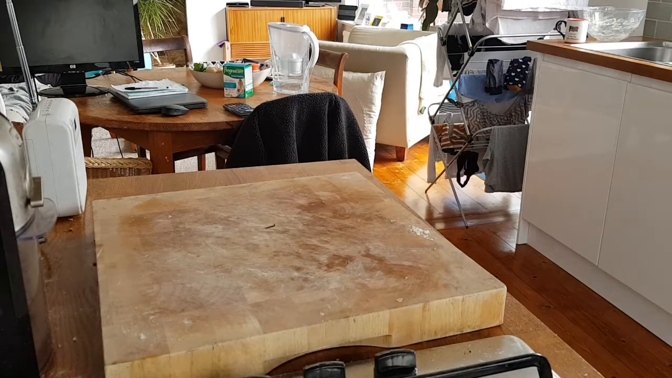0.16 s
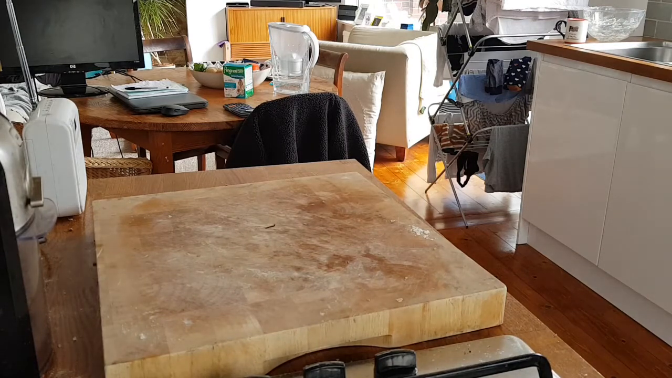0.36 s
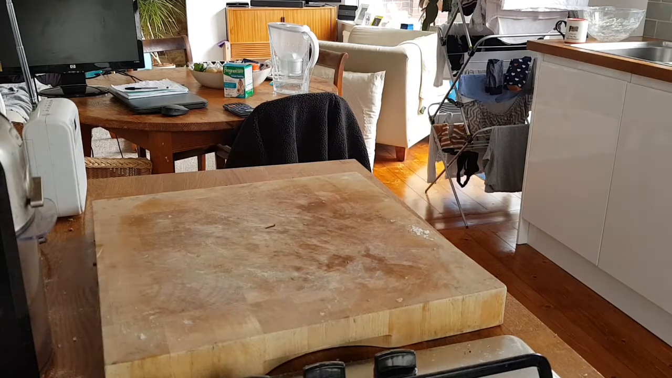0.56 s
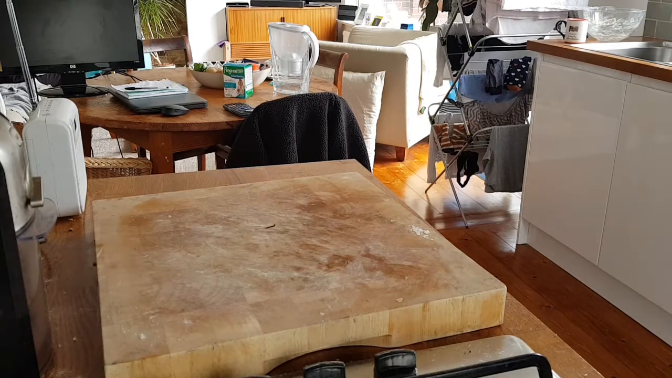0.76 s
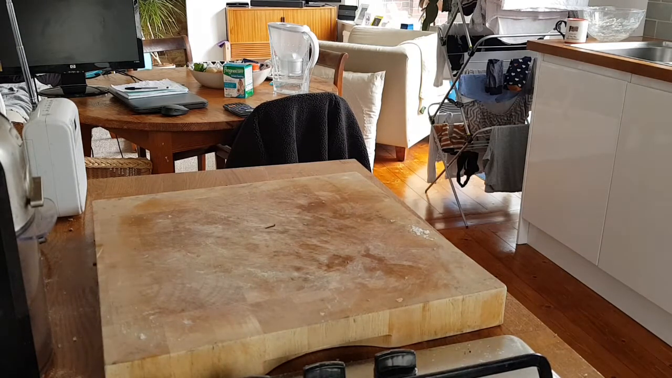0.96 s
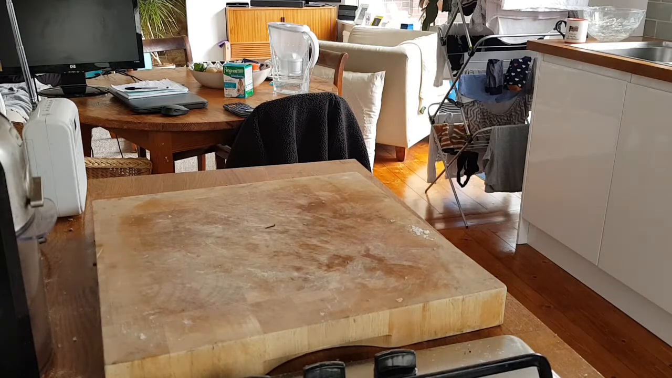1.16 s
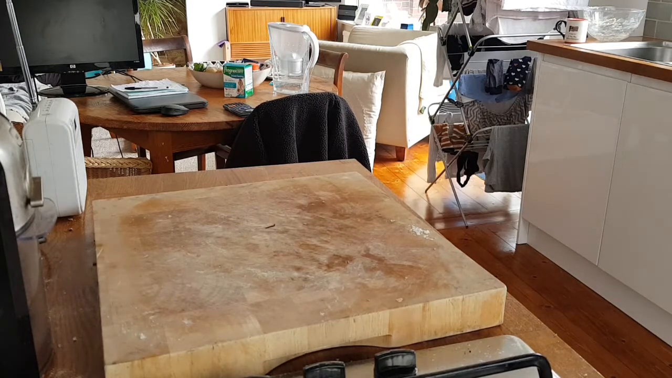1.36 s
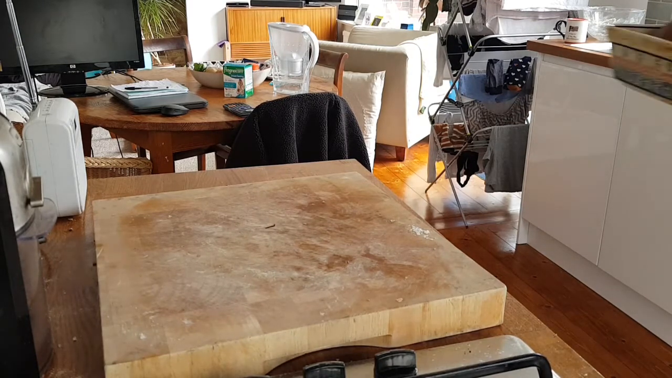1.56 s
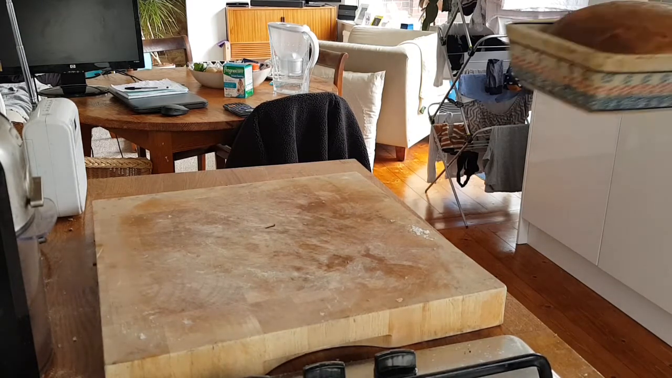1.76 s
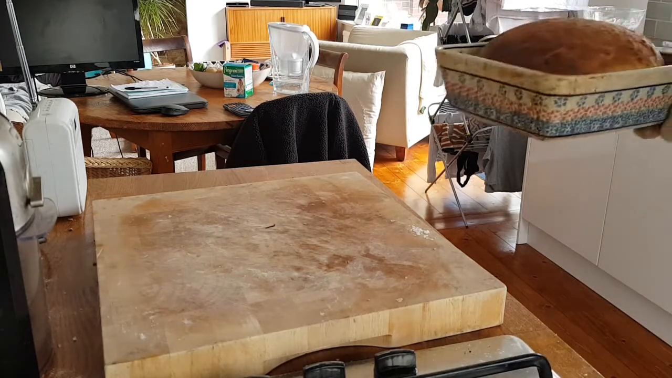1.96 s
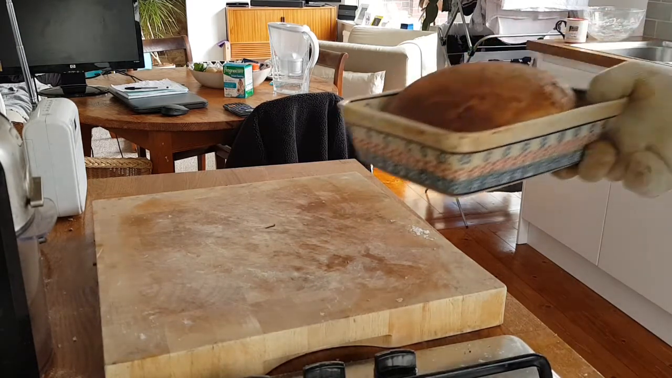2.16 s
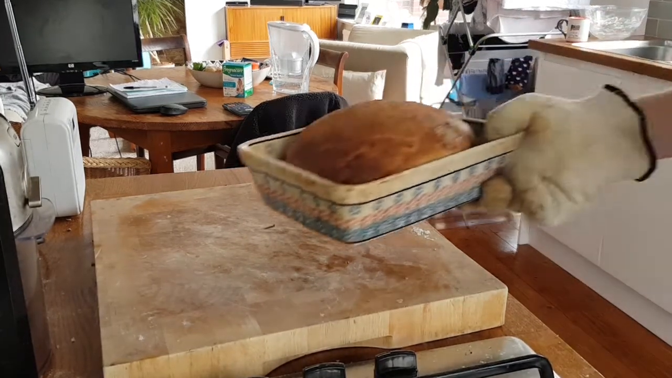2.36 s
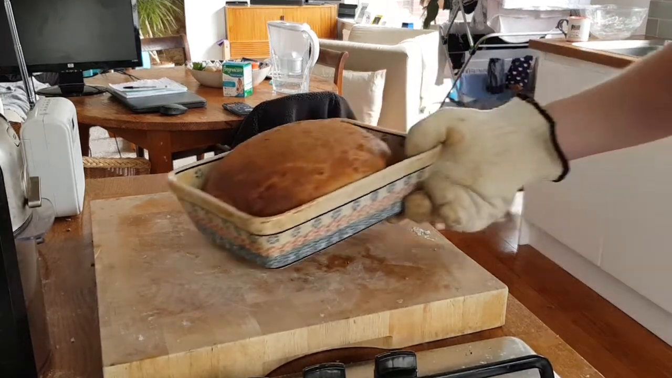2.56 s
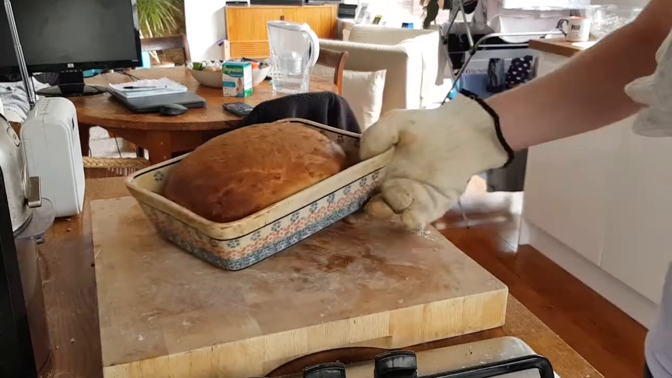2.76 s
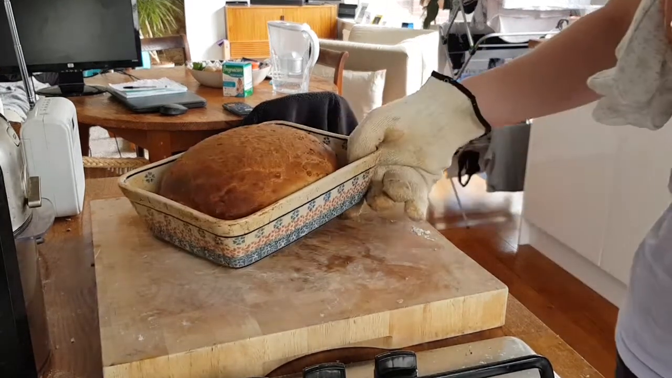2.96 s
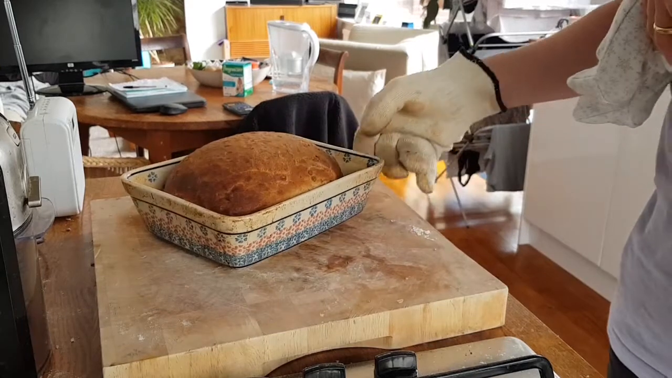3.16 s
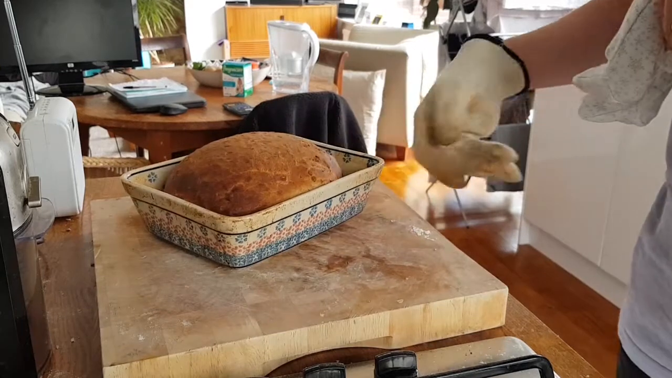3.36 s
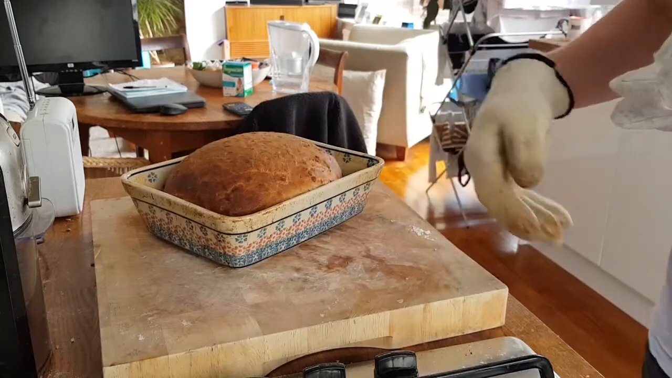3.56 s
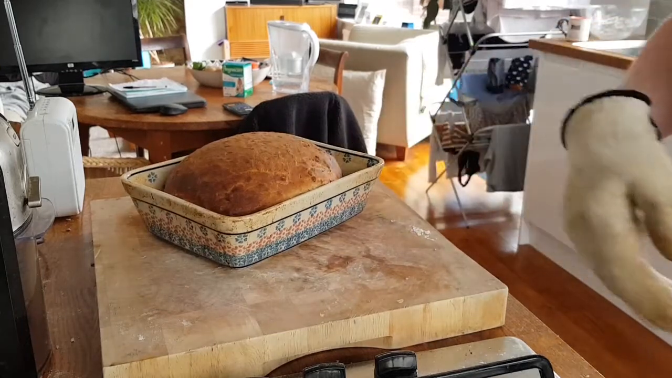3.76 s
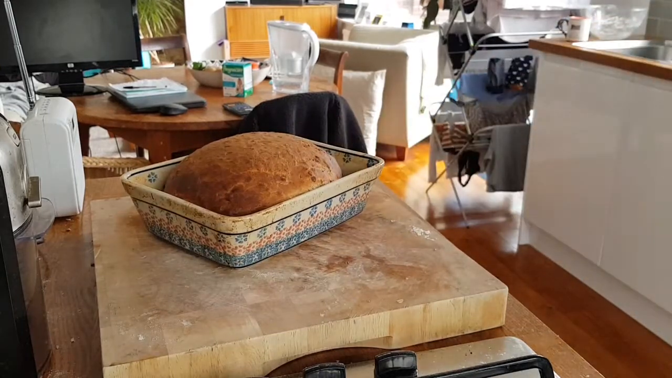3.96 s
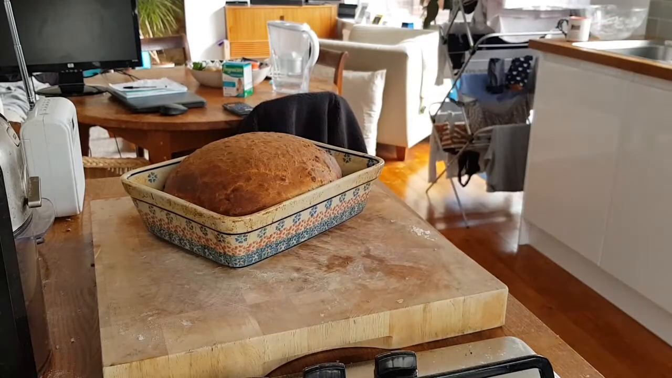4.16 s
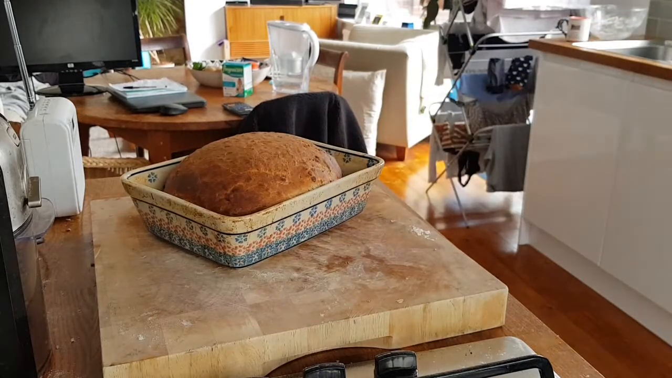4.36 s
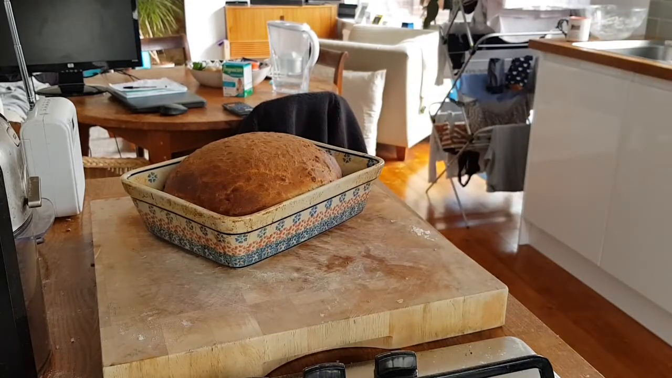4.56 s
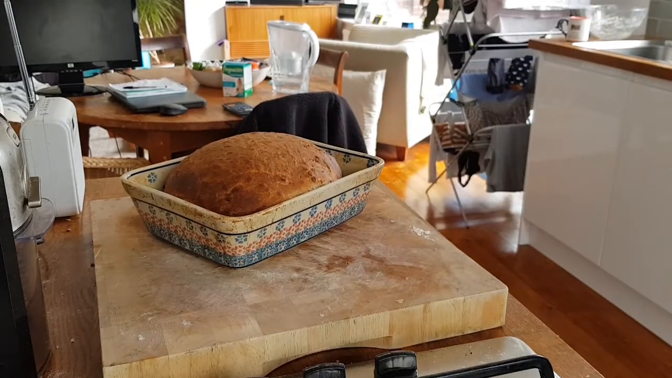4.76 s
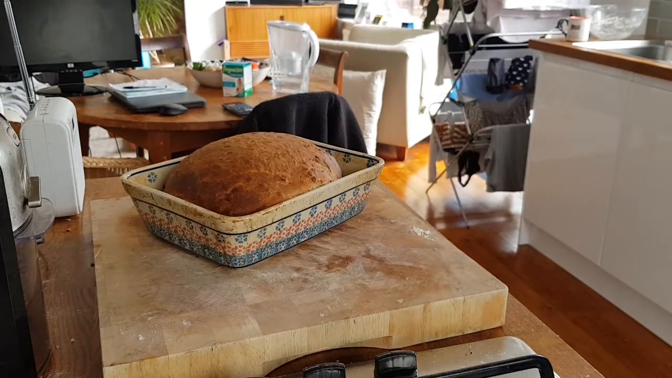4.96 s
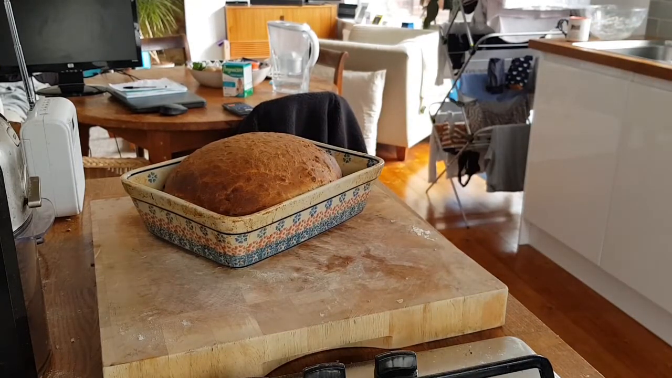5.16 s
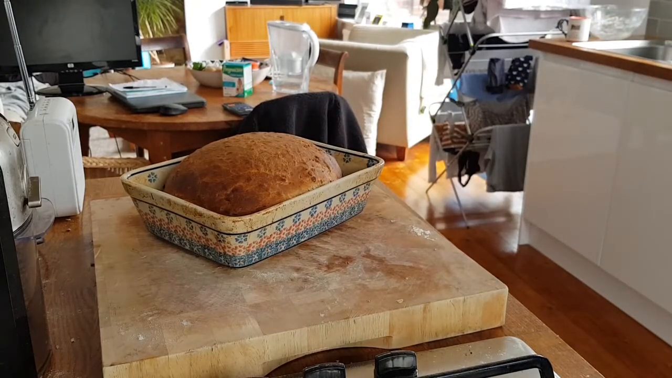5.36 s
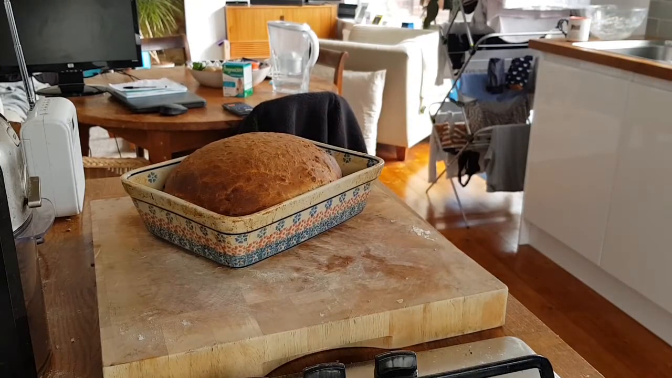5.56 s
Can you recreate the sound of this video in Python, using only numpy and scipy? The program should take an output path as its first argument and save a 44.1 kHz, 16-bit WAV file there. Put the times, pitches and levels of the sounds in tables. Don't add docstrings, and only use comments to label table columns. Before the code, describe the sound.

Soft footsteps cross a kitchen floor, stiff gloves crackle, then a heavy ceramic dish lands on thick wood with two knocks over a fridge hum.

```python
import sys
import numpy as np
from scipy import signal
from scipy.fft import rfft, irfft
from scipy.io import wavfile
from scipy.ndimage import uniform_filter1d

SR = 44100
rng = np.random.default_rng(int(sys.argv[2]) if len(sys.argv) > 2 else 0)


def inscribe(sig):
    pcm = np.round(np.clip(np.atleast_2d(sig).T, -1, 1) * 32767)
    wavfile.write(sys.argv[1], SR, pcm.astype(np.int16))


def volts_from_db(level):
    exponent = np.asarray(level, float) / 20
    return 10 ** exponent


N = 247886
T = np.arange(N) / SR
PORT_LAG_S = 0.0004

# (frequency [Hz], level [dB], t60 [s])
FLOORBOARD = [(67.8, -47, 0.36), (138.1, 3.5, 0.18), (172.6, -15, 0.36), (253, -5, 0.094)]


def on_log(hz, table):
    f, v = np.transpose(table)
    return np.interp(np.log(hz + 1), np.log(f), v)


def colour(x, table):
    g = volts_from_db(on_log(np.fft.rfftfreq(x.shape[-1], 1 / SR), table))
    return irfft(rfft(x) * g / np.sqrt(np.mean(g ** 2)), x.shape[-1])


def pair(size):
    # (frequency [Hz], coherence [0..1])
    likeness = [(150, 1), (300, 0.92), (600, .8), (1000, 0.15), (1500, 0.063), (4000, 0.02)]
    hz = np.fft.rfftfreq(size, 1 / SR)
    c = np.clip(on_log(hz, likeness), 0, 1)
    mid, side = rfft(rng.standard_normal((2, size)))
    left = np.sqrt(1 + c) * mid + np.sqrt(1 - c) * side
    right = np.sqrt(1 + c) * mid - np.sqrt(1 - c) * side
    delay = np.exp(-2j * np.pi * hz * PORT_LAG_S)
    return irfft([left * delay, right], size) / np.sqrt(2)


def late(x):
    return np.array([np.interp(T - PORT_LAG_S, T, x), x])


def sides(pan_db):
    return volts_from_db(np.array([[pan_db], [-pan_db]]) / 2)


def narrow(hz, width):
    g = 1 / (1 + (2 * (np.fft.rfftfreq(N, 1 / SR) - hz) / width) ** 2)
    return irfft(rfft(pair(N)) * g / np.sqrt(np.mean(g ** 2)), N)


def ring(modes):
    t = T[:SR // 2]
    return sum(volts_from_db(db) * np.sin(2 * np.pi * hz * t) * 1000. ** (-t / t60) for hz, db, t60 in modes)


def swell(start, length, rise=0.36):
    t = np.maximum(T - start, 0) / length
    return (1 - np.exp(-t / rise)) * np.exp(-t) * 2


def strokes(table):
    total = 0
    for s, db, attack, hold, release in table:
        below = np.maximum((s - T) / attack, (T - s - hold) / release)
        total = total + volts_from_db(db - 20 * np.maximum(0, below).clip(0, 9))
    return total


def rough(rate, depth_db):
    k = int(SR / rate)
    levels = np.repeat(rng.standard_normal(N // k + 1), k)
    return volts_from_db(depth_db * uniform_filter1d(levels, k)[:N])


def room(x, wet_db, gap_s):
    # (frequency [Hz], t60 [s])
    room_t60 = [(60, 0.56), (250, .38), (1000, 0.37), (4000, 0.36), (9000, 0.33), (16000, .2)]
    # (frequency [Hz], level [dB], t60 [s])
    room_modes = [(68, -58.5, 0.13), (129.34, -53, 0.3)]
    t, noise, tail = T[:SR], rfft(pair(SR)), 0
    octave = np.log2(np.fft.rfftfreq(SR, 1 / SR) + 1)
    for hz in 31.25 * 2. ** np.arange(10):
        band = irfft(noise * np.clip(1 - abs(octave - np.log2(hz)), 0, 1), SR)
        tail = tail + band * 1000. ** (-t / on_log(hz, room_t60))
    tail = tail * (1 - np.exp(-(t / gap_s) ** 2)) * volts_from_db(wet_db) / np.sqrt(SR / 40)
    tail[:, :SR // 2] += ring(room_modes)
    wet = signal.fftconvolve(x[1:], tail)[:, :N]
    return signal.sosfilt(signal.butter(2, 50., "high", fs=SR, output="sos"), x + wet)


def kitchen():
    # (frequency [Hz], width [Hz], level [dB])
    hum_lines = [(99.6, 12, -61), (108, 35, -55.5), (52.83, 12, -73), (194, 17, -71.5), (480, 21, -79.5),
                 (652.5, 20, -81.5), (700, 6, -81.5), (1130, 89, -81.5)]
    # (frequency [Hz], density [dB per Hz])
    air_tint = [(20, -1.5), (60, -3), (150, -4), (260, -7.5), (430, -19.5), (640, -11.5), (780, -21.5),
                (1200, -23), (1400, -31), (2200, -39.5)]
    # (frequency [Hz], density [dB per Hz])
    hiss_tint = [(880, -38), (1500, -9), (1990, -3.5), (2920, -7), (3410, -8.5), (8620, -11), (11800, -5.5),
                 (15500, -6)]
    hum = sum(volts_from_db(db) * narrow(hz, width) for hz, width, db in hum_lines)
    hum = hum + volts_from_db(-58) * np.sqrt(2) * late(np.sin(2 * np.pi * 100 * T))
    air = volts_from_db(-61.5) * rough(16, 1.5) * colour(pair(N), air_tint)
    hiss = volts_from_db(-74.5) * colour(pair(N), hiss_tint)
    return (hum + air) * sides(1.7) + hiss


def squeaks():
    # (time [s], length [s], frequency [Hz], width [Hz], level [dB])
    rubs = [
        (0.132, 0.012, 7160, 500, -72.5),
        (0.149, 0.022, 9840, 500, -78),
        (2.446, .018, 13000, 400, -59),
        (2.488, .1, 2200, 300, -73.5),
        (2.779, .1, 2702, 500, -64.5),
        (3.08, .05, 2604, 800, -60.5),
        (4.678, 0.01, 2790, 400, -61),
        (4.691, .03, 3815, 500, -70),
    ]
    return sum(volts_from_db(db) * swell(s, length, rise=0.2) * narrow(hz, width) for s, length, hz, width, db in rubs)


def steps():
    # (time [s], slap peak [dB], thump [dB re slap], scuff [dB re slap], contact [s])
    footfalls = [(0.164, -52, 9, -50, 0.017), (0.547, -53, -6, -6.5, 0.024), (0.563, -43, -13, -11, 0.019),
                 (0.709, -36.5, -8, -19.5, 0.016), (0.857, -46.5, 0, -45, 0.0086),
                 (1.21, -40.5, -10, -12.5, 0.028), (1.304, -46, -13, -15, 0.022),
                 (1.415, -34.5, -20, -12.5, 0.042), (1.44, -34, -2, -4.5, 0.012),
                 (1.971, -40.5, -18, -11.5, 0.019), (2.149, -43, -5, -13.5, 0.017),
                 (2.165, -36, -5.5, -16.5, 0.013), (2.448, -40.5, 2.5, -11.5, 0.017),
                 (4.043, -54, -19, -15, 0.03592), (4.677, -53, 4, -8, 0.04),
                 (4.969, -46.5, -15, -21, 0.019)]
    # (frequency [Hz], density [dB per Hz])
    slap_tint = [(120, -19.5), (200, -4), (377, -6), (535, -7.5), (823, -8.5), (2110, -23), (3620, -27),
                 (11000, -67)]
    # (frequency [Hz], density [dB per Hz])
    scuff_tint = [(1060, -25), (1500, -5), (2080, -8.5), (2650, -3), (3400, -6.5), (6710, -11.5),
                  (12700, -9), (15500, -17)]
    thump, slap, scuff = np.zeros(N), np.zeros((2, N)), np.zeros((2, N))
    for s, db, thump_db, scuff_db, length in footfalls:
        slap = slap + volts_from_db(db) * swell(s, length) * sides(-2.5)
        scuff = scuff + volts_from_db(db + scuff_db) * swell(s, length, rise=0.19) * sides(-1.5)
        thump = thump + volts_from_db(db + thump_db) * swell(s, 0.84 * length)
    force = thump * (1 + 12 * rng.standard_normal(N))
    boards = signal.fftconvolve(force, ring(FLOORBOARD))[:N]
    sole = volts_from_db(-10) * slap * rough(120, 3.17) * colour(pair(N), slap_tint)
    drag = volts_from_db(-2.5) * scuff * rough(200, 1.2) * colour(pair(N), scuff_tint)
    return volts_from_db(-50.0) * late(boards) + sole + drag


def claps():
    # (time [s], peak [dB], centre [Hz], thump [dB re peak], contact [s])
    sole_claps = [(.568, -50, 425.9, 5.5, 0.013), (0.672, -47, 700, 0, 0.027),
                  (0.711, -48, 868.6, 1, 0.0088), (1.531, -35.5, 577, -17, 0.021),
                  (1.534, -40.5, 1400, -30, 0.014), (1.586, -40.5, 2370, -30, 0.0125),
                  (1.588, -50, 8748, -30, .015), (1.592, -33, 730, -18, 0.022),
                  (2.192, -46, 293, -21, 0.0099), (4.116, -54.5, 352.7, 3.5, 0.02),
                  (4.765, -37.5, 1120, -30, 0.029), (4.768, -38.5, 480, 1.5, .03),
                  (4.975, -53, 500, -20, .02)]
    out = 0
    for s, db, hz, thump_db, length in sole_claps:
        tint = [(hz / 8, -14.0), (hz / 2, -3.0), (hz, 0), (2 * hz, -7.0), (3 * hz, -24.0), (16 * hz, -50.0)]
        burst = swell(s, length, rise=0.067) * colour(pair(N), tint)
        thump = signal.fftconvolve(swell(s, 0.0017), ring(FLOORBOARD))[:N]
        out = out + volts_from_db(db - 6.5) * (burst + volts_from_db(thump_db - 30.5) * late(thump))
    return rough(120, 1.5) * out


def rustle():
    # (time [s], level [dB], attack [s], hold [s], release [s])
    brushes = [(0.75, -70.5, .005, .005, .09), (0.862, -72, .03, .002, .045), (1.2, -60, 0.034, .002, .004),
               (1.63, -56, .008, 0.028, .55), (1.97, -56, 0.0085, .002, .004),
               (2.106, -57, 0.082, .002, .07), (2.79, -60, 0.055, 0.12, .25),
               (3.09, -51.5, .017, .075, .01), (4.126, -60.5, 0.02081, .002, .045),
               (4.68, -60.5, .03, .075, .03), (4.62, -73, 0.315, .1, .3)]
    # (frequency [Hz], density [dB per Hz])
    rustle_tint = [(590, -42), (1000, -8.5), (1220, -4.5), (1490, -10), (2740, -10), (3490, -11.5),
                   (4650, -12.5), (12500, -17), (15500, -32.5)]
    return volts_from_db(-8) * strokes(brushes) * rough(42, 1.2) * colour(pair(N), rustle_tint)


def crackle():
    # (time [s], peak [dB], length [ms], sparkle [dB re peak])
    crackles = [(2.2772, -34.5, 2.6, -26), (2.2823, -41, 1.5, -22), (2.29, -37, 2.4, -14.5),
                (2.297, -42, 2.2, -6), (2.3035, -40, 2.2, -13), (2.319, -44.5, 2, -12),
                (2.3315, -42.5, 3, 2.5), (2.3385, -29, 1, -0.5), (2.3427, -32, 1.3, 5),
                (2.3634, -42.5, 3, -8.5), (2.370, -41, 3, -4.5), (2.4039, -36, 3.4, -5.5),
                (2.4347, -37.5, 4.5, -8), (2.467, -46.5, 7.8, -12), (2.489, -51, 4.5, -15)]
    # (time [s], level [dB], attack [s], hold [s], release [s])
    bed_strokes = [
        (2.278, -42.5, .002, 0.027, .06),
        (2.34, -47.5, .01, 0.022, .04),
        (2.44, -57.5, .1, .01, .09),
    ]
    # (frequency [Hz], density [dB per Hz])
    crackle_tint = [(350, -27), (900, -4), (1880, -15), (2540, -8.5), (3900, -9.5), (4700, 0), (6000, 0),
                    (7500, -15), (15500, -30)]
    # (frequency [Hz], density [dB per Hz])
    sparkle_tint = [(5000, -30), (8000, 2), (10500, 2), (13000, -7), (15500, -6)]
    snaps = [volts_from_db(db - 11.5) * swell(s, ms / 1000, rise=0.12) for s, db, ms, _ in crackles]
    bed = volts_from_db(-12.5) * strokes(bed_strokes)
    grain = rough(700, 2.5)
    body = (sum(snaps) + bed) * grain * colour(pair(N), crackle_tint)
    edge = sum(snap * volts_from_db(row[-1]) for snap, row in zip(snaps, crackles)) + volts_from_db(-6.0) * bed
    return body + edge * grain * colour(pair(N), sparkle_tint)


def gain():
    # (time [s], depth [dB], hold [s], recovery [s])
    ducks = [
        (2.727, 2.5, .3, 0.4),
        (3.193, -10, 0.93, 0.54),
    ]
    db = sum(depth_db * (T > s) * np.clip(1 - (T - s - hold) / back, 0, 1) for s, depth_db, hold, back in ducks)
    return volts_from_db(uniform_filter1d(db, size=400))


def dish():
    # (time [s], modes [dB], clatter [dB], rise [ms], clatter length [s])
    knocks = [
        (2.73, -27.5, -17, 1.2, 0.013),
        (3.1865, -25.5, -10.5, 0.18, 0.03),
    ]
    # (frequency [Hz], level [dB], t60 [s])
    edge_modes = [(132, -1.5, .3), (242, -5.5, .05), (407, -6.5, .03), (530, 1, 0.04), (740, 5, .05),
                  (830, 0, 0.036), (1100, -3.5, .025), (1903, -12, 0.02)]
    # (frequency [Hz], level [dB], t60 [s])
    base_modes = [(71.5, -8, .25), (130, 2, 0.33), (573, 1, .06), (690, -3.5, .06), (916, -5.5, .06),
                  (1191, 1.5, 0.17), (1395, -2.5, .06), (1910, -4.5, 0.056), (1891, -1.5, .06)]
    # (frequency [Hz], density [dB per Hz])
    edge_clatter = [(88, -31), (150, -5.5), (306, -12.5), (378, -10.5), (780, -1.5), (954, -11),
                    (1050, -11.5), (1510, -25), (2600, -40), (2920, -48.5), (15000, -71)]
    # (frequency [Hz], density [dB per Hz])
    base_clatter = [(88, -34.5), (150, -8.5), (314, -16.5), (428, -7), (471, -9), (708, -6), (844, -6),
                    (1150, -3.5), (2020, -8), (4480, -20), (7560, -41), (9180, -38), (15500, -56)]
    # (frequency [Hz], level [dB], t60 [s])
    glaze = [(2690, -23.5, .15), (3810, -15.5, 0.18), (4614, -8.5, 0.12), (5450, -11.5, .12),
             (6630, -6, 0.053), (7320, -8.5, .12), (8180, -7, 0.11), (8860, -0.5, .09), (10400, -2.5, 0.06),
             (11100, -3, .08), (12200, -3, .08), (13100, -4, .07), (14300, -4, .08), (14900, -5, .08)]
    out = 0
    stiff = signal.butter(2, 110., "high", fs=SR, output="sos")
    blows = zip(knocks, (edge_modes, base_modes), (edge_clatter, base_clatter))
    for (s, modes_db, clatter_db, rise_ms, length), modes, tint in blows:
        t = np.maximum(T - s, 0)
        push = t * np.exp(-t * 4000 / rise_ms)
        rings = -late(signal.fftconvolve(push / push.sum(), ring(modes))[:N])
        envelope = (1 - np.exp(-(t * 1000 / rise_ms) ** 2)) * np.exp(-t / length)
        clatter = signal.sosfilt(stiff, envelope * rough(250, 2.0) * colour(pair(N), tint))
        walls = sides(4.0) * signal.fftconvolve(clatter[0], ring(glaze))[:N]
        clatter = clatter + volts_from_db(-32.5 - 10 * (rise_ms - 0.3545)) * walls
        out = out + (volts_from_db(modes_db) * rings + volts_from_db(clatter_db) * clatter) * sides(2.5)
    return out


def whine():
    # (time [s], level [dB], attack [s], hold [s], release [s])
    whine_swell = [
        (3.4, -73, .6, .1, 2.2),
    ]
    return strokes(whine_swell) * np.sin(2 * np.pi * 500.6 * T) * rough(13.0, 1.5)


def swish():
    # (time [s], level [dB], attack [s], hold [s], release [s])
    sleeve_strokes = [
        (5.03, -54, .08, 0.011, 0.19),
        (5.296, -65, .08, .025, 0.124),
        (5.478, -71.5, .15, .002, .2),
    ]
    # (frequency [Hz], density [dB per Hz])
    sleeve_tint = [(590, -31), (1000, -11), (1120, -6.5), (1680, -14.5), (2130, -10.5), (4540, -8),
                   (6790, -10.5), (11500, -6), (15500, -16.5)]
    return volts_from_db(-3.0) * strokes(sleeve_strokes) * rough(75, 2.3) * colour(pair(N), sleeve_tint)


def scene():
    feet = room(steps() + claps(), wet_db=-0.5, gap_s=0.012)
    cloth = room(squeaks() + rustle() + crackle() + swish(), wet_db=-4.0, gap_s=0.005)
    near = room(dish(), wet_db=-0.5, gap_s=0.0041)
    return kitchen() * gain() + feet + cloth + near + whine()


def top_cut(x):
    return signal.sosfilt(signal.butter(12, 15850, fs=SR, output="sos"), x)


def record(dry):
    thin = signal.sosfilt(signal.butter(2, 24., "high", fs=SR, output="sos"), dry)
    rounded = np.tanh(0.89 * thin) / 0.7
    cut = signal.ellip(8, .2, 70, 15400, fs=SR, output="sos")
    return top_cut(signal.sosfilt(cut, rounded))


dry = scene()
out = record(dry)
inscribe(out)
```